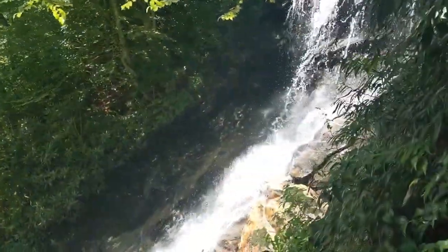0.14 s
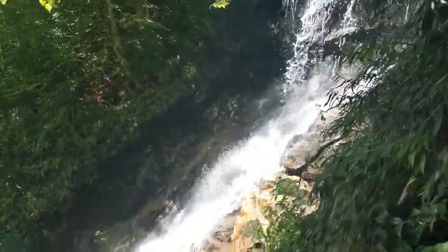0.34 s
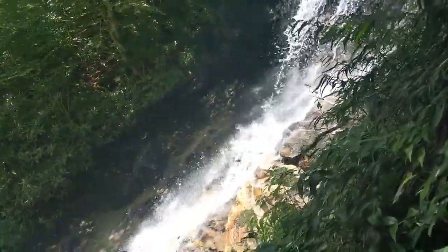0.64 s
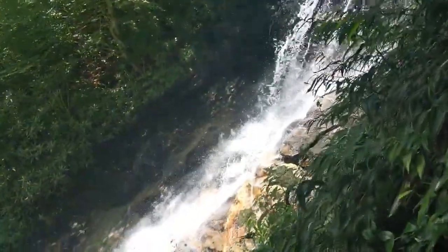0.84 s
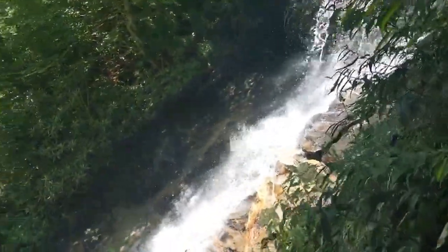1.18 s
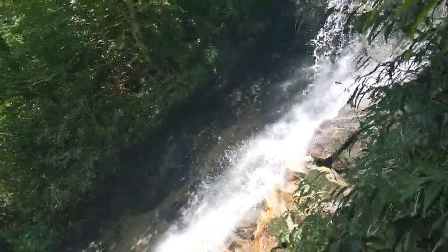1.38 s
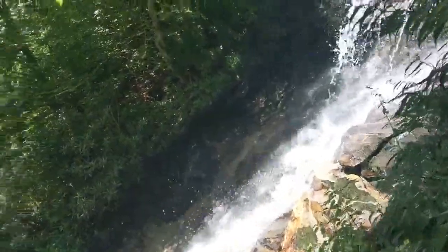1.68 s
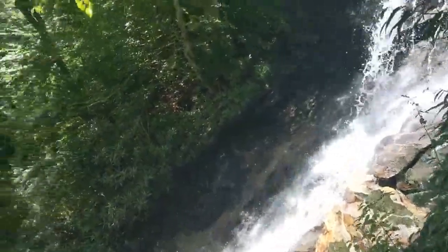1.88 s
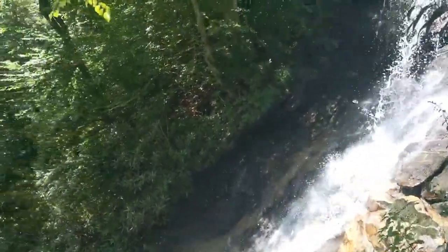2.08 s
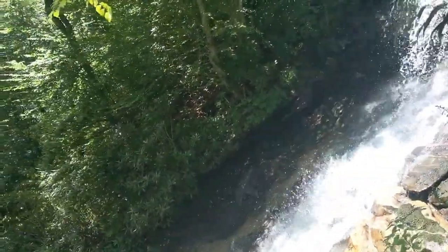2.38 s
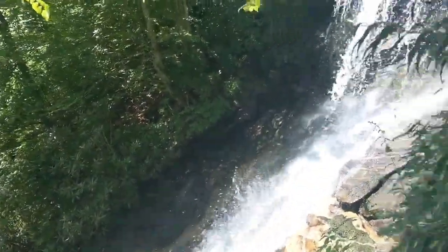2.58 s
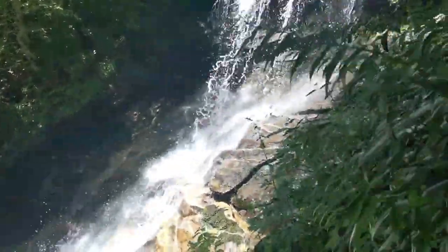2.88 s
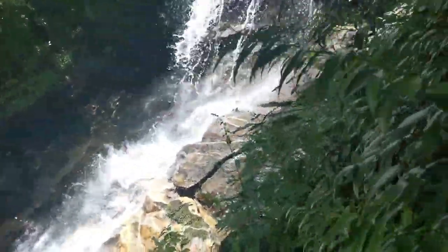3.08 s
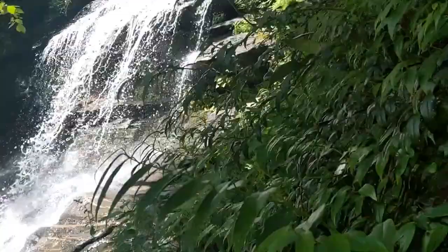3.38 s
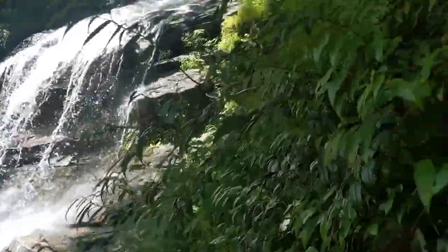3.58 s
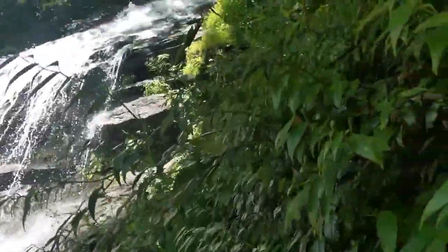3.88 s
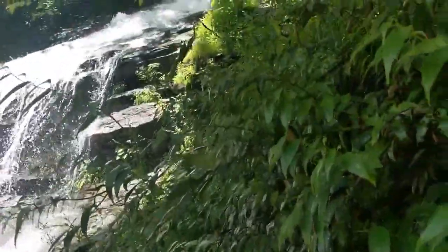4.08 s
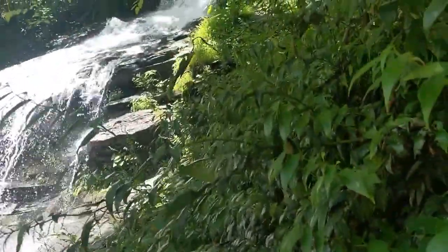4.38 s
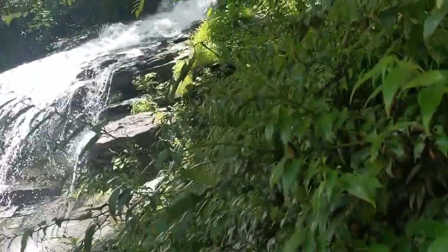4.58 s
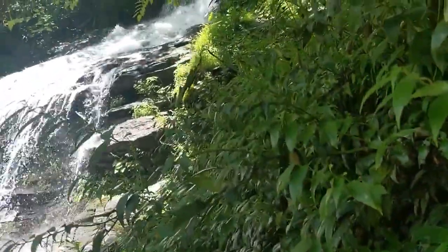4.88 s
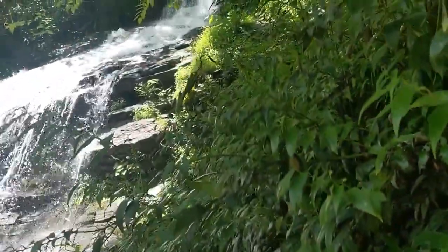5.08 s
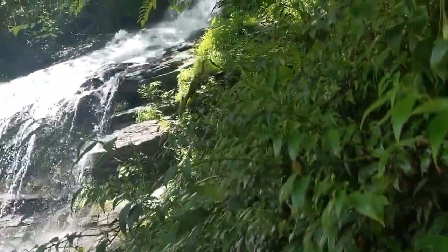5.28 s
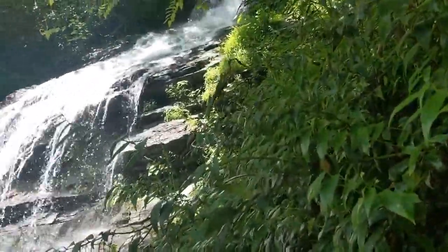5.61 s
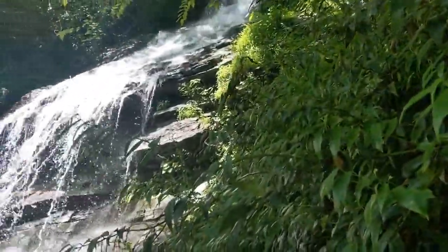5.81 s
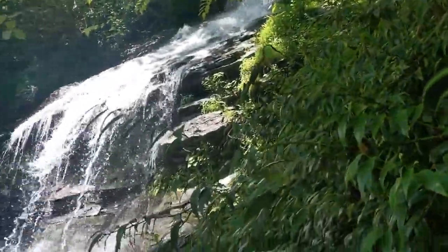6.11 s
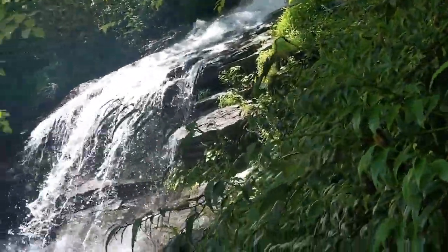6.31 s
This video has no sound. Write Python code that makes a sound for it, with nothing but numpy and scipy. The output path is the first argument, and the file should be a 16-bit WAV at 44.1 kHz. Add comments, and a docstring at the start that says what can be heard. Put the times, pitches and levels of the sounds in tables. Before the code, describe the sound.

A continuous waterfall for about 6.4 seconds, heard from a leafy bank in wide stereo. From the start, bright spray hisses on all sides, fluttering finely with countless drops and faint nearby ticks, while white water churns in the middle range with dense splashes and small ringing bubbles, near the centre and slightly left. Below is a low rumble, with a strong dull boom at 0.1 s and more near 1.3-1.5, 3.1 and 5.3 s. Slugs of water thud and slap irregularly, around 0.2, 1.2, 2.1-2.3, 3.0-3.3, 3.6, 4.2, 4.9, 5.6 and 6.1 s, each brief and blended into the rush. The spray strengthens slightly from 1 to 2 s, with tiny dips between 2.4 and 3.4 s. From about 3.1 to 3.7 s the microphone turns right: the stream shifts clearly left, slightly softer, spray a touch louder. The rush continues to the end, the stream easing partly back toward centre.

```python
"""Waterfall in a wooded gorge

A waterfall slides down a rock face, heard from the bank through two microphone ports.
Spray hisses as filtered noise and dense drops, the stream churns as splashes with ringing bubbles,
and slugs of water thud and slap as swelling volleys of clicks over a low noise rumble with booms.
Half-way through the microphone turns right: the stream moves left; the spray is louder by then."""
import sys
import numpy as np
from scipy import signal
from scipy.fft import rfft, irfft, next_fast_len
from scipy.io import wavfile
from scipy.ndimage import map_coordinates

SR = 44100
rng = np.random.default_rng(int(sys.argv[2]) if len(sys.argv) > 2 else 0)


def log_audio(samples):
    """Write samples as a 16-bit WAV file to the path given in sys.argv[1]."""
    # one column per channel
    frames = np.atleast_2d(samples).T
    # limit to full scale, then quantise
    limited = np.clip(frames, -1, 1)
    pcm = np.round(limited * 32767).astype(np.int16)
    wavfile.write(sys.argv[1], SR, pcm)


N = 284445
TIME = np.arange(N) / SR  # s
SIZE = next_fast_len(N)
BIN_HZ = np.maximum(np.arange(SIZE // 2 + 1) * SR / SIZE, 1)
SIDES = np.array([[.5], [-.5]])  # left and right share of a difference between the ports


def from_db(db):
    """Logarithmic level: 20 dB is a factor of ten in amplitude."""
    return 10 ** (np.asarray(db) / 20)


def rms_one(x):
    """Normalisation: scale to an rms of 1."""
    return x / np.sqrt(np.mean(x ** 2) + 1e-20)


def in_time(rows):
    """Linear interpolation of a curve at every sample."""
    return np.interp(TIME, *np.transpose(rows))


def in_hz(points):
    """Interpolation of a table at every frequency, on a logarithmic axis."""
    hz, value = np.transpose(points)
    return np.interp(np.log(BIN_HZ), np.log(hz), value)


def filtered(x, response):
    """Linear filtering: multiply the spectrum by a frequency response."""
    return irfft(rfft(x, SIZE) * response, SIZE)[..., :N]


def coloured(x, spectrum):
    """Spectral shaping: give a white signal a spectrum, at rms 1."""
    return rms_one(filtered(x, from_db(in_hz(spectrum))))


def drift(rate):
    """Low-passed noise: slow chance of rms 1, changing about rate times a second."""
    return rms_one(filtered(rng.standard_normal(N), 1 / (1 + (BIN_HZ / rate) ** 2)))


def impacts(per_s, spread_db):
    """Shot noise: random clicks of either sign, many small and a few large; rms 1."""
    sizes = from_db(spread_db * np.minimum(rng.exponential(1, N), 5))
    signs = rng.choice([-1, 1], N)
    struck = rng.random(N) < per_s / SR
    return rms_one(sizes * signs * struck)


def ring(clicks, hz, cycles):
    """Damped resonance: each click rings a sine that falls 60 dB in the given cycles."""
    radius = from_db(-60 * hz / (cycles * SR))
    angle = 2 * np.pi * hz / SR  # radians per sample
    feedback = [1, -2 * radius * np.cos(angle), radius * radius]
    return signal.lfilter([0, np.sin(angle)], feedback, clicks + 1e-18)


PORT_SPACING_M = 0.137


def scattered(spectrum):
    """Diffuse field: rock and leaves return sound from all round; only long waves agree at both ports."""
    alike = np.sinc(2 * BIN_HZ * PORT_SPACING_M / 343)  # 343 m/s is the speed of sound
    noise = rng.standard_normal((2, N))
    mid, side = filtered(noise, np.sqrt([1 + alike, 1 - alike]))
    return coloured(mid + 2 * SIDES * side, spectrum)


# Shade of the housing on the stream at full turn.
# Each row: frequency in Hz, left minus right in dB.
STREAM_SHADE = [(100, -0.5), (230, 3), (400, 13), (600, 11.5), (950, 9.5), (1450, -1), (3000, 5),
                (8000, -5)]


def from_stream(x, turn, lead_s=.00006, turn_lead_s=0.00021):
    """Arrival time and shadowing: turning gives the left port more lead and shades mostly the right."""
    lead = (lead_s + turn_lead_s * turn) * SR  # samples
    pair = np.array([map_coordinates(x, [np.arange(N) + side * lead], order=3, mode="nearest")
                     for side in SIDES[:, 0]])
    shaded = filtered(pair, from_db(SIDES * in_hz(STREAM_SHADE)))
    return pair + turn * (shaded - pair)


RISE_SHARE = 0.37  # rise of a slug or boom, as a share of its decay


def swell(s, decay_s):
    """Transient power of water landing: a quick rise to time s, then exponential decay."""
    age = (TIME - s) / decay_s
    fall = np.where(age < 0, (age / RISE_SHARE) ** 2, age)
    return np.exp(-np.minimum(fall, 60))


def patchy(x, depth_db, rate, top_share=0.64, count=9):
    """Independent band modulation: drops of each size shower by themselves, the finest most steadily."""
    centres = np.geomspace(1500, 14000, count)  # Hz
    # overlapping triangular bands that add up to the whole
    bands = (filtered(x, in_hz(list(zip(centres, share)))) for share in np.eye(count))
    depths_db = np.linspace(depth_db, depth_db * top_share, count)
    return sum(band * from_db(db * drift(rate)) for band, db in zip(bands, depths_db))


# Level of the steady spray, which rises before and during the turn.
# Each row: time in seconds, level in dB.
SPRAY_NEARNESS = [(0, -29), (1.0, -29), (2.1, -27.5), (3.45, -27.5), (3.62, -26.5), (5.7, -27),
                  (5.85, -27.5), (6.45, -27.5)]
# Brief dips of the hiss. Each entry: centre in seconds.
HISS_DIPS = [2.36, 2.78, 3.1, 3.43]
DIP_DB, DIP_WIDTH_S = 1.0, 0.044
THROWN_SPRAY_DB, THROWN_SPRAY_S = 2.5, .07  # spray thrown up by a slug: level against its slap, decay


def spray_level():
    """Power addition: the steady spray with its dips, plus the spray that each slug throws up."""
    dips = sum(np.exp(-np.minimum(((TIME - s) / DIP_WIDTH_S) ** 2, 20)) for s in HISS_DIPS)
    steady = from_db(in_time(SPRAY_NEARNESS) - DIP_DB * dips)
    thrown = sum(swell(s, THROWN_SPRAY_S) * from_db(db + slap_db + THROWN_SPRAY_DB) ** 2
                 for s, db, _, slap_db in SLUG_LANDINGS)
    return np.sqrt(steady ** 2 + thrown)


# Spectrum of the spray. Each row: frequency in Hz, relative density in dB per Hz.
SPRAY_SPECTRUM = [(150, -25.5), (500, -11), (1000, -9), (1900, -6), (2900, -1), (4200, 1.5), (6000, -.5),
                  (8500, -3.5), (11000, -3.5), (13000, -4), (15700, -5)]


def spray(drops_db=-8.0, near_db=-30.0):
    """Superposition of drops: countless fine ones merge to a hiss; some tick on leaves close by."""
    showers = np.array([impacts(per_s=7000, spread_db=2.5) for side in SIDES])
    drops = coloured(showers, SPRAY_SPECTRUM)
    near = coloured(impacts(per_s=22, spread_db=1.0), SPRAY_SPECTRUM)
    hiss = rms_one(scattered(SPRAY_SPECTRUM) + from_db(drops_db) * drops + from_db(near_db) * near)
    return patchy(hiss, depth_db=1.15, rate=17) * spray_level()


# Spectrum of the stream's splashes. Each row: frequency in Hz, relative density in dB per Hz.
STREAM_SPECTRUM = [(40, -36), (125, -2.5), (210, -3), (270, -4), (400, -9), (540, 0), (700, -1.5),
                   (950, 0.5), (1450, 2), (2000, -4.5), (3100, -10), (6000, -9), (15000, -29)]
STREAM_DB, TURNED_AWAY_DB = -42, -1.4  # main stream when faced; its change at full turn


def stream(turn, bubbles_db=-7.5, scatter_db=-19.5, churn_db=0.72):
    """Bubble resonance in white water: dense splashes, with air bubbles of many sizes ringing in them."""
    splashes = coloured(impacts(per_s=9000, spread_db=2.0), STREAM_SPECTRUM)
    pitches = np.geomspace(330, 1650, 40)  # Hz
    # the factor hz strengthens the higher bubbles
    bubbles = sum(ring(impacts(per_s=45, spread_db=2.0), hz, cycles=26) * hz for hz in pitches)
    water = from_stream(splashes + from_db(bubbles_db) * rms_one(bubbles), turn)
    water = water + from_db(scatter_db) * scattered(STREAM_SPECTRUM)
    return water * from_db(STREAM_DB + TURNED_AWAY_DB * turn + churn_db * drift(rate=23))


# Spectrum of the rumble. Each row: frequency in Hz, relative density in dB per Hz.
PLUNGE_SPECTRUM = [(8, -8), (22, 2), (45, -3), (70, -0.5), (110, -3.5), (200, -11), (600, -36), (3000, -80)]
# Deep booms in the rumble. Each row: peak in seconds, level in dB.
DEEP_BOOMS = [(.13, -50), (.41, -59), (.69, -55), (.765, -55), (.94, -57), (1.31, -51.5), (1.46, -52),
              (3.0, -57.5), (3.11, -54), (3.54, -58), (5.27, -54), (5.59, -58)]
BOOM_DECAY_S = 0.033
RUMBLE_DB, RUMBLE_TURNED_DB = -64.5, 1.5  # steady rumble at the foot of the fall; its change at full turn


def plunge(turn, apart_db=-5.5):
    """Coherence at low frequency: the rumble is much alike at both ports and at times swells to a boom."""
    shared = rng.standard_normal(N)
    apart = rng.standard_normal((2, N))
    rumble = coloured(shared + from_db(apart_db) * apart, PLUNGE_SPECTRUM)
    booms = sum(swell(s, BOOM_DECAY_S) * from_db(db) ** 2 for s, db in DEEP_BOOMS)
    return rumble * np.sqrt(from_db(RUMBLE_DB + RUMBLE_TURNED_DB * turn) ** 2 + booms)


# Slugs of water landing.
# Each row: peak in seconds, relative thud level in dB, power decay in seconds, slap against thud in dB.
SLUG_LANDINGS = [(.122, -41, .018, -8), (.2, -45.5, 0.085, 2), (1.088, -47.5, .023, -13),
                 (1.197, -46, .037, 7.5), (1.276, -44, 0.031, -9), (2.087, -47.5, 0.038, 9.5),
                 (2.254, -40.5, 0.031, -2), (2.34, -46, .04, -8), (2.607, -49, .016, -4),
                 (2.95, -47.5, 0.029, 10), (3.134, -40.5, 0.016, 0), (3.262, -46.5, 0.038, 5),
                 (3.574, -47, .046, 5), (3.637, -45.5, .03, 3), (3.921, -47, .025, -5),
                 (4.222, -43.5, 0.035, 4.5), (4.945, -41.5, .025, -4), (5.592, -41, 0.029, 2),
                 (5.663, -46, .035, 2), (6.095, -48.5, 0.047, 6.5)]
# Spectra of thud and slap. Each row: frequency in Hz, relative density in dB per Hz.
THUD_SPECTRUM = [(20, -20), (80, -3), (135, -1.5), (200, 1.5), (270, 1.5), (340, 1), (520, -0.5),
                 (1000, -31), (4000, -60)]
SLAP_SPECTRUM = [(100, -45), (350, -8), (550, 3), (900, 2.5), (1400, -6), (3000, -32), (12000, -14)]


def slugs(turn, scatter_db=-11.5, level_db=-1.0):
    """Impact and trapped air: a slug lands as a short volley of slaps over the thud of its air."""
    thud_power, slap_power = np.zeros(N), np.zeros(N)
    for s, db, decay_s, slap_db in SLUG_LANDINGS:
        landing = swell(s, decay_s)
        thud_power += landing * from_db(db) ** 2
        slap_power += landing * from_db(db + slap_db) ** 2
    out = 0
    for power, spectrum in ((thud_power, THUD_SPECTRUM), (slap_power, SLAP_SPECTRUM)):
        volley = from_stream(coloured(impacts(per_s=1000, spread_db=2.0), spectrum), turn)
        out = out + np.sqrt(power) * (volley + from_db(scatter_db) * scattered(spectrum))
    return from_db(level_db) * out


# Heading of the microphone. Each row: time in seconds, turn as a share of the full turn.
MICROPHONE_TURN = [(0, 0.13), (1.6, 0.1), (2.3, 0), (3.1, 0.26), (3.7, 1), (4.5, 1.05), (5.6, 1.0),
                   (6.45, 0.67)]


def scene():
    """Superposition of all parts of the fall at the two ports."""
    turn = in_time(MICROPHONE_TURN)
    return spray() + stream(turn) + plunge(turn) + slugs(turn)


# Resonances and notches of the microphone housing.
# Each row: centre in Hz, width in Hz, gain in dB.
HOUSING_RESONANCES = [(342, 15, 4.5), (917, 294, 3), (1170, 310, -1.5), (2054, 220, -2.5), (3190, 520, 1.5),
                      (4700, 450, -1), (5680, 720, 3.5), (7440, 930, 4.5), (8500, 600, 0), (9530, 910, 5),
                      (10760, 560, -2), (11650, 700, 2.5), (12650, 1100, -3), (14000, 900, 3)]
# Level difference of the ports. Each row: frequency in Hz, left minus right in dB.
PORT_LEVELS = [(60, 1.8), (200, 0), (500, 2), (1000, 2.5), (1450, 7), (2000, 3.5), (2700, 2), (4000, 2),
               (6000, 2), (8000, 1.5), (10000, 0.7), (12600, -0.2), (14000, 3), (15500, 9)]
# Phase difference of the ports. Each row: frequency in Hz, lead of the left in radians.
PORT_LEADS = [(60, 0.27), (200, -0.81), (450, -1.12), (1200, -1.05), (3000, -0.58)]
CUTOFF_HZ = 15780


def record(dry):
    """Resonance and transfer response: the housing colours each port in its own way; the top is cut."""
    housing_db = sum(db / (1 + (2 * (BIN_HZ - hz) / width) ** 2) for hz, width, db in HOUSING_RESONANCES)
    ports = from_db(SIDES * in_hz(PORT_LEVELS)) * np.exp(1j * SIDES * in_hz(PORT_LEADS))
    low_pass = from_db(-np.clip((BIN_HZ - CUTOFF_HZ) / 3, 0, 90))  # 1 dB every 3 Hz, down to -90 dB
    return filtered(dry, from_db(housing_db) * ports * low_pass)


dry = scene()
out = record(dry)
log_audio(out)
```